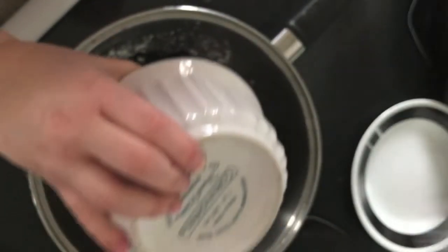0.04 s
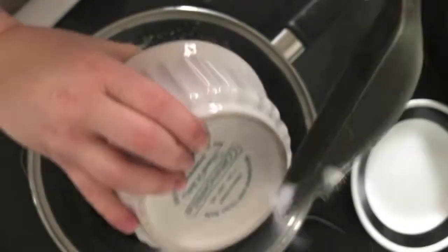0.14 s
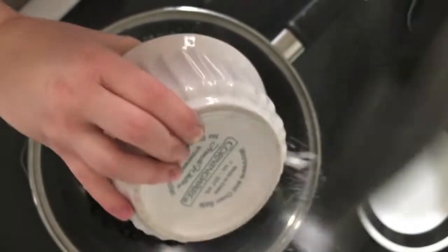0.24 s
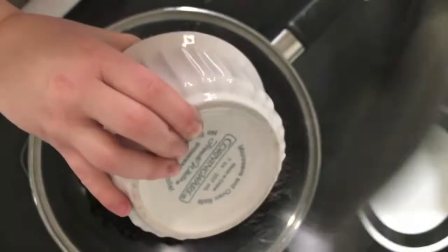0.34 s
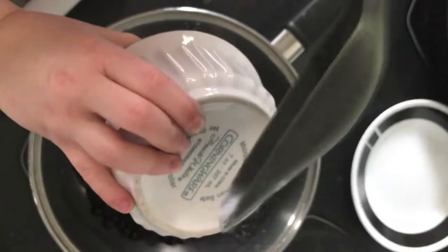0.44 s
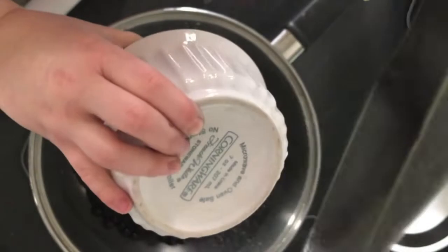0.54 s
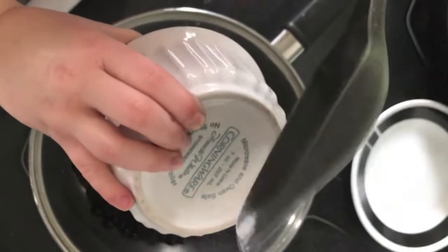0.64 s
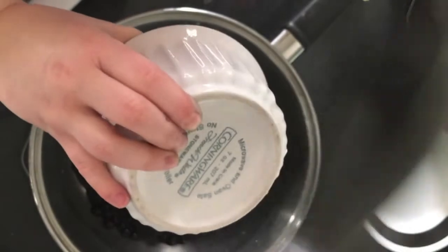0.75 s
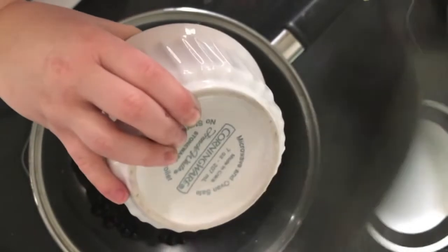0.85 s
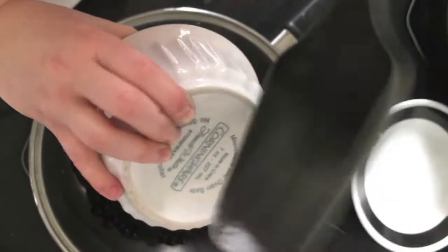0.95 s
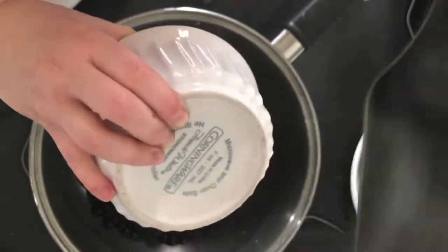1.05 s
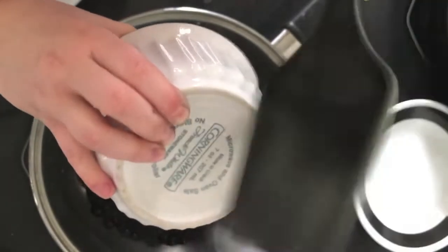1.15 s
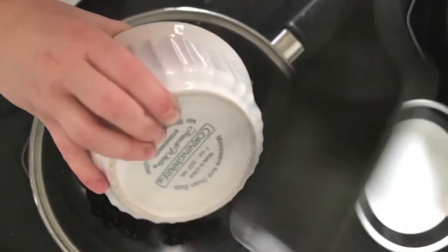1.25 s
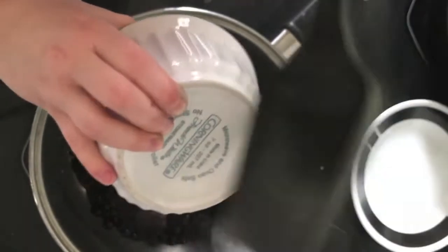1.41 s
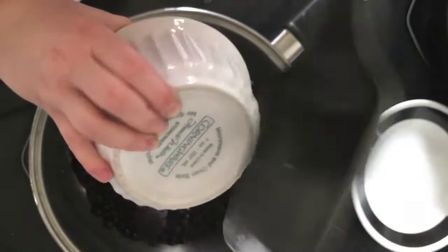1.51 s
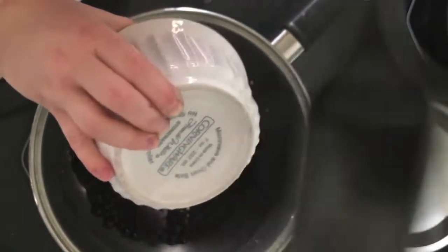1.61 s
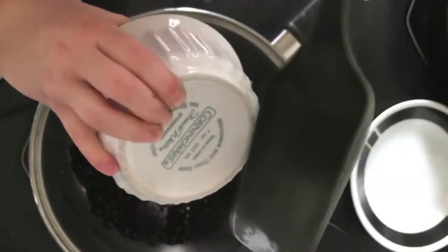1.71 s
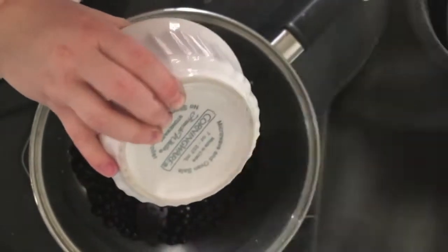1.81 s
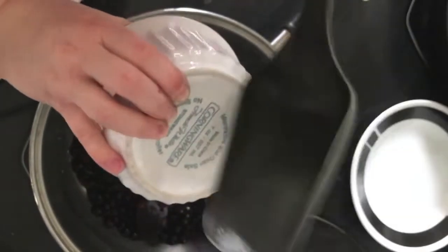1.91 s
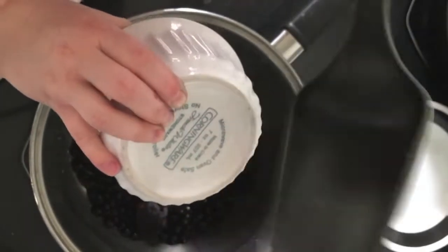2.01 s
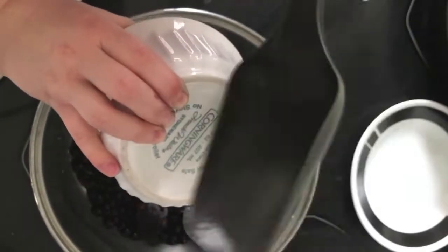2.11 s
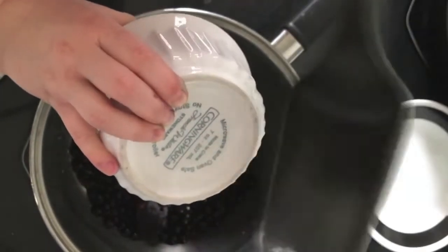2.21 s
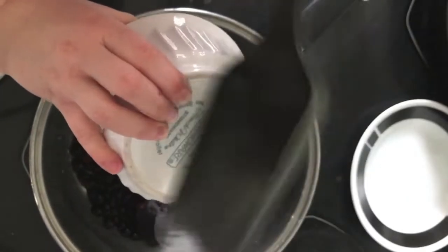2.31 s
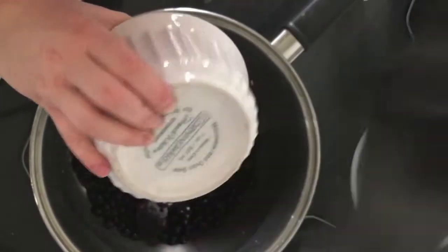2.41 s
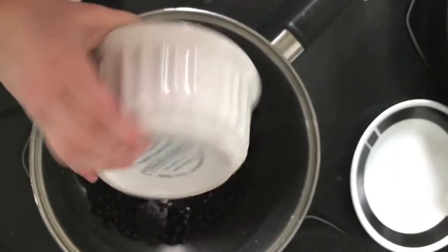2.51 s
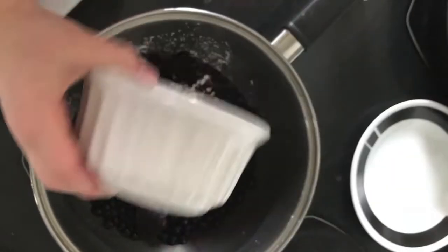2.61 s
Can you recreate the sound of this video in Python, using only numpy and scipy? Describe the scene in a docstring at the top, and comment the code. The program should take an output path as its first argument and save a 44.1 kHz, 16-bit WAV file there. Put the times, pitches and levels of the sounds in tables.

```python
"""In a small kitchen, an upturned ceramic ramekin held in one hand over a pot is tapped about four times
a second; some taps bounce. Each tap is a hard clack with a low thud: a crack of noise over the dish's
modes. The fingers damp the dish, so it rings on only now and then. The close taps overload the
microphone. The room answers briefly, and an appliance hums underneath, with a rush of air and faint hiss."""
import sys
import numpy as np
from scipy import signal
from scipy.fft import rfft, irfft
from scipy.io import wavfile

SR = 44100
rng = np.random.default_rng(int(sys.argv[2]) if len(sys.argv) > 2 else 0)


def waveform_to_disk(signal):
    """Save audio, clipped to [-1, 1], as 16-bit WAV at the path in sys.argv[1]."""
    frames = np.transpose(np.atleast_2d(signal))
    scaled = np.clip(frames, -1, 1) * 32767
    samples = np.round(scaled).astype(np.int16)
    wavfile.write(sys.argv[1], SR, samples)


N = 116865


def ramekin():
    """Each tap cracks on the ceramic and wakes its modes: a damped clack, a note, free ring, a rim ping."""
    # Taps and bounces; tone and note depend on where the dish is struck. Each row: start in seconds,
    # strength in dB, seven tone gains in dB (thump, knock, body, low mid, presence, brilliance, treble),
    # free ring in dB, rim ping in dB, decay length factor, note pitch in Hz, note level in dB.
    taps = [(0.195, -45, -10, -10, 2, 9, 3, -13, -14, 5, -20, 1.0, 1750, -15),
            (0.2173, 9.5, -6, -16, 0.5, 1.5, -3.5, -3, -5.5, -6.5, -2.5, 0.93, 1790, -6),
            (0.4829, -2, 11, 4.5, 6, 9.5, -5.5, 1.5, -1, -11, -26, 1.05, 1954, -8),
            (0.713, 1.5, 9.5, 1, 4, 0.5, -14, -4.5, -4, -12.5, -8, 1.11, 1855, -9.5),
            (0.76, -27.5, 2, 14, 14, 4, 1, -8, -15, -15, -11, 1.06, 2200, -15),
            (0.9690, 1.5, -2.5, 4, -17.5, -5, -3.5, -5.5, -0.5, -18, -12, 1.16, 2412, -10),
            (1.2246, 8, -9, -3.5, -12.5, -7, -2.5, -1.5, 0, -41, -21, 0.78, 2437, -9),
            (1.2524, -5, -8, -2, 2, 2.5, 3, 1, 3, -30, -39, 0.84, 2420, -7),
            (1.2705, -11.5, -16, -14, -15, -4, -1, -1, -0.5, -28, -20, 0.68, 3320, -11),
            (1.4982, 1.5, 1, 2, -10.5, -1.5, 4.5, 0.5, 2, -30, -23, 1.05, 3190, -3.5),
            (1.531, -4, 3, 0.5, -1, -4, 0, -0.5, 0, -18, -28, 1.22, 3386, -9),
            (1.5618, -15, -5, -4, -10, -3, -6, -3.5, -6, -23, -20, 1, 2240, -12),
            (1.741, 7.5, 1.5, -2, -3, -5.5, -2.5, -2.5, -1, -39, -28, 0.97, 2440, -10.5),
            (1.7779, 1.5, 6.5, 2.5, 6.5, -5, -1, -2.5, -2.5, -17, -16, 0.96, 2218, -6.5),
            (1.9583, -0.5, 1.5, -10, -3, 0, 0.5, 1, 5, -17.5, -12, 1.11, 4540, -8),
            (2.1840, -7, -37, -6.5, -21, -3, 6.5, -2.5, 3.5, -31, -19, 1.08, 3200, -5),
            (2.3399, -7.5, -18, -7, 0, -1, 5, 3.5, 3.5, -23, -7, 1.47, 4100, -7.5),
            (2.3611, -9, -8, -20, -24, 1, -1.5, 5.5, -7, -12, 1, 0.82, 1310, -2.5),
            (2.37, -18, -13, -14, -8, 9, -5, -18, -3, -15, -17, 1.3, 1360, -10),
            (2.394, -31.5, -5, -12, -6, 2, 0, 5, 3.5, -17, -15, 2.9, 4140, -12),
            (2.5411, -36, -3, 1, 7, 12.5, -5, 8, 8, -32, -25, 5.4, 1037, -5)]
    # Centres in Hz of the seven tone bands, with a fifth entry between them that stays at 0 dB.
    colour_hz = (150, 450, 850, 1300, 2200, 3000, 4500, 8000)
    # Modes the fingers choke. Each row: pitch in Hz, level in dB, T60 in seconds before the length factor.
    clack_modes = [(151, -22.5, 0.031), (347, -25.5, 0.022), (560, -27, 0.025), (916, -15.5, 0.022),
                   (1213, -15.5, 0.019), (1422, -20.5, 0.041), (1695, -21.5, 0.054), (1887, -23, 0.042),
                   (2210, -10.5, 0.024), (2417, -13.5, 0.031), (3141, -11.5, 0.026), (3407, -14, 0.023),
                   (3753, -10.5, 0.013), (4083, -17, 0.022), (4485, -22.5, 0.041), (7550, -12.5, 0.014)]
    # Modes that sing on in a loose grip, laid out like the clack's.
    ring_modes = [(930, -20, 0.078), (1125, -15, 0.11), (1230, -24, 0.091), (1770, -15, 0.06),
                  (1910, -34, 0.49), (2018, -4, 0.055), (2580, -23, 0.29), (2650, -33, 0.34),
                  (3670, -32, 0.14)]
    # The rim's ping, the clearest mode. One row: pitch in Hz, level in dB, T60 in seconds.
    rim_mode = [(2742, -17.5, 0.19)]
    # The dense, rough part of the ring. Each row: frequency in Hz, relative level in dB.
    wash_spectrum = [(600, -12), (900, -3.5), (1200, 3), (1450, -2), (1900, 13.5), (2200, -8), (2450, -17),
                     (2750, 12.5), (3100, 5), (4000, -7), (6000, -6), (14000, -50)]
    note_t60_s, wash_t60_s, wash_db = 0.026, 0.29, -17.5
    out, t = np.zeros(N), np.arange(16384) / SR
    short = t[:len(t) // 4]
    for start, db, *tone_db, ring_db, ping_db, length, note_hz, note_db in taps:
        colour = list(zip(colour_hz, tone_db[:4] + [0] + tone_db[4:]))
        crack = contact_crack(short, colour, length)
        clack = struck_modes(clack_modes, short, colour, length)
        note = amp(note_db) * np.cos(2 * np.pi * note_hz * short) * fade(short, note_t60_s * length)
        wash = amp(wash_db) * coloured(noise(wash_spectrum, len(t)), colour) * fade(t, wash_t60_s)
        ring = struck_modes(ring_modes, t, colour, length=0.83)
        ping = struck_modes(rim_mode, t, colour, length=1)
        add(out, amp(db) * (crack + note + clack), start)
        add(out, amp(db + ring_db) * (wash + ring), start)
        add(out, amp(db + ping_db) * ping, start)
    return out


def contact_crack(t, colour, length):
    """The hard contact: a burst of noise with a sharp snap at its front, coloured by the spot struck."""
    # Tone of the crack. Each row: frequency in Hz, relative level in dB.
    spectrum = [(100, -21.5), (400, 2), (780, -7.5), (1500, -1), (2400, -1.5), (4000, -1), (5200, -4.5),
                (8000, -5), (11000, -6.5), (16000, -11)]
    crack_db, crack_t60_s, snap_db, snap_t60_s = -6, 0.024, 7, 0.0022
    envelope = fade(t, crack_t60_s * length) + amp(snap_db) * fade(t, snap_t60_s * length)
    # Keeping only the phases irons out the burst's chance peaks and dips.
    phases = np.angle(rfft(rng.standard_normal(len(t)) * envelope))
    burst = coloured(irfft(np.exp(1j * phases), len(t)), spectrum)
    burst *= np.sqrt(np.sum(envelope ** 2) / np.sum(burst ** 2))
    taper = np.linspace(1, 0, len(t)) ** 2
    return amp(crack_db) * coloured(burst, colour) * taper


def struck_modes(modes, t, colour, length):
    """The dish's modes: decaying sines of alternating sign, weighted by the place of the blow."""
    return sum((-1) ** k * amp(db + at_hz(colour, hz)) * np.sin(2 * np.pi * hz * t) * fade(t, t60 * length)
               for k, (hz, db, t60) in enumerate(modes))


def kitchen_reverb(sound):
    """The small room's reflections: a diffuse tail that dies away band by band."""
    # Tone of the tail. Each row: frequency in Hz, relative level in dB.
    room_colour = [(100, -19), (500, 7), (1500, -3.5), (4000, 0.5), (8000, 4), (16000, 1.5)]
    # Decay of the tail. Each row: frequency in Hz, T60 in seconds.
    room_t60 = [(100, 0.13), (1000, 0.2), (2500, 0.34), (6000, 0.23), (16000, 0.16)]
    wet_db = -16.5
    t, tail = np.arange(SR // 2) / SR, 0
    edges_hz = np.geomspace(80, 18000, 10)
    for low, high in zip(edges_hz, edges_hz[1:]):
        band_pass = signal.butter(2, [low, high], "band", fs=SR, output="sos")
        band = signal.sosfilt(band_pass, rng.standard_normal(len(t)))
        hz = np.sqrt(low * high)
        tail += band * amp(at_hz(room_colour, hz)) * fade(t, at_hz(room_t60, hz))
    tail /= np.sqrt(np.sum(tail ** 2))
    return amp(wet_db) * signal.fftconvolve(sound, tail)[:N]


def appliance_hum():
    """Low tones that waver in level and phase, the higher ones more."""
    # The appliance's tones. Each row: pitch in Hz, rms level in dB.
    tones = [(59.3, -42), (144, -50), (192.5, -50), (240.7, -41.5), (295.8, -50)]
    top_waver, waver_hz = 0.14, 3
    t, hum = np.arange(N) / SR, 0
    for hz, db in tones:
        waver = top_waver * hz / tones[-1][0]
        phase = 2 * np.pi * (hz * t + rng.random()) + waver * drift(waver_hz)
        level = amp(db) * (1 + waver * drift(waver_hz))
        hum += np.sqrt(2) * level * np.sin(phase)
    return hum


def air_rush():
    """The appliance's air: a steady bed of low noise."""
    # Tone of the rush. Each row: frequency in Hz, relative level in dB.
    spectrum = [(25, -49), (50, -33), (90, 3), (120, -7), (170, 1), (215, 4.5), (280, -3), (400, -17.5),
                (700, -17.5), (1500, -27.5), (4000, -36), (16000, -45.5)]
    return amp(db=-42) * noise(spectrum, N)


def faint_hiss():
    """A soft hiss that fades in over the first half second and holds."""
    # Tone of the hiss. Each row: frequency in Hz, relative level in dB.
    spectrum = [(300, 9.5), (1000, -2), (2500, -3.5), (6000, -5.5), (10000, -9.5), (16000, -11)]
    # Its fader curve. Each row: time in seconds, rms level in dB.
    levels = [(0, -88), (.19, -57), (.45, -47), (1.2, -48.5), (2.1, -48.5), (2.65, -48)]
    level_db = np.interp(np.arange(N) / SR, *np.transpose(levels))
    return amp(level_db) * noise(spectrum, N)


def amp(db):
    """Decibels to gain."""
    return 10 ** (np.asarray(db) / 20)


def at_hz(points, hz):
    """Read a curve on a log-frequency axis."""
    points_hz, values = np.transpose(points)
    return np.interp(np.log(np.maximum(hz, 1)), np.log(points_hz), values)


def fade(t, t60):
    """Exponential decay, 60 dB down after t60 seconds."""
    return np.exp(-np.log(1000) * t / max(t60, 1e-3))


def coloured(sound, points):
    """Equalise a sound with a curve of (Hz, dB) points."""
    gain = amp(at_hz(points, np.fft.rfftfreq(len(sound), 1 / SR)))
    return irfft(rfft(sound) * gain, len(sound))


def noise(points, size):
    """Coloured noise of rms 1."""
    shaped = coloured(rng.standard_normal(size), points)
    return shaped / np.sqrt(np.mean(shaped ** 2) + 1e-20)


def drift(rate_hz):
    """A slow wander, gliding from one random value to the next."""
    knots = rng.standard_normal(256)
    return np.interp(np.arange(N) / SR * rate_hz, np.arange(len(knots)), knots)


def add(out, sound, start_s):
    """Mix a sound in at its start time."""
    i = int(start_s * SR)
    out[i:i + len(sound)] += sound[:len(out) - i]


def scene():
    """The dish and its reflections over the kitchen's hum, rush and hiss, in mono."""
    dish = ramekin()
    return (dish + kitchen_reverb(dish) + appliance_hum() + air_rush() + faint_hiss())[None]


def record(dry):
    """The microphone overloads: the loudest peaks clip flat; the deep bass and the very top are cut."""
    ceiling, low_cut_hz, high_cut_hz = 0.9, 42.6, 16100
    clipped = np.clip(dry, -ceiling, ceiling)
    lean = signal.sosfilt(signal.butter(2, low_cut_hz, "high", fs=SR, output="sos"), clipped)
    return signal.sosfilt(signal.ellip(10, .1, 70, high_cut_hz, fs=SR, output="sos"), lean)


dry = scene()
out = record(dry)
waveform_to_disk(out)
```